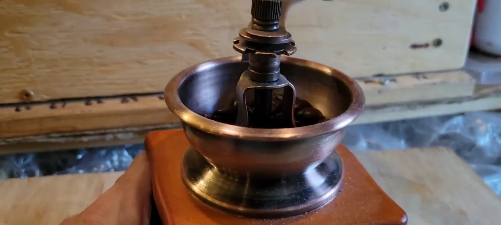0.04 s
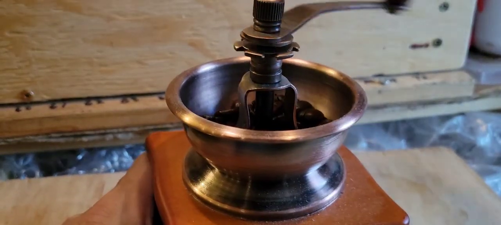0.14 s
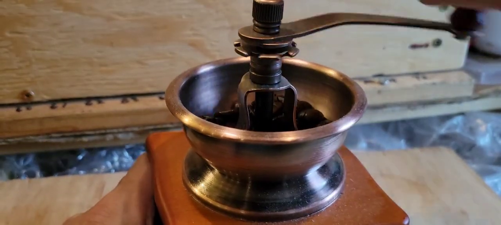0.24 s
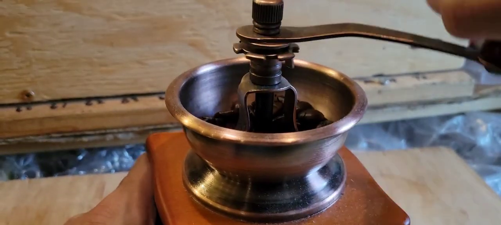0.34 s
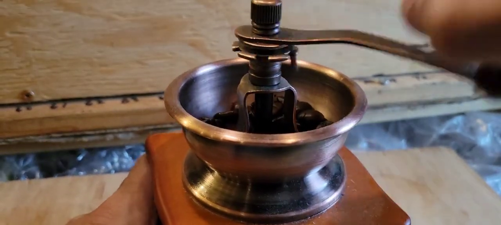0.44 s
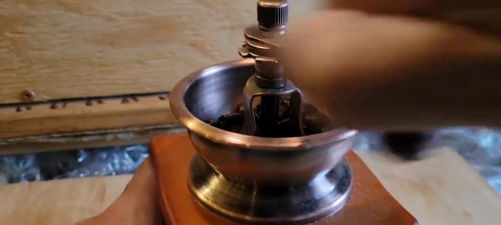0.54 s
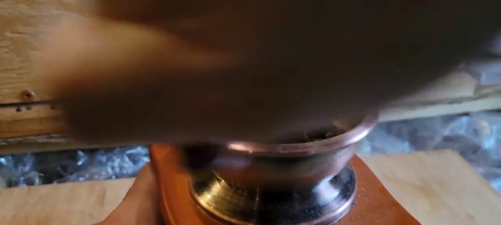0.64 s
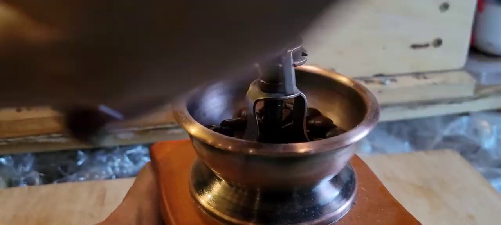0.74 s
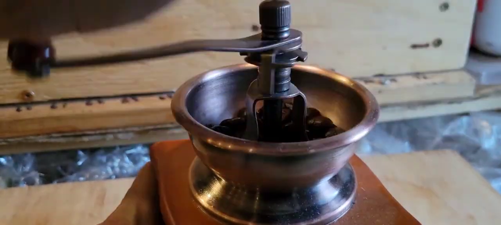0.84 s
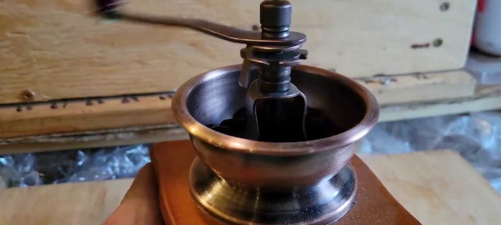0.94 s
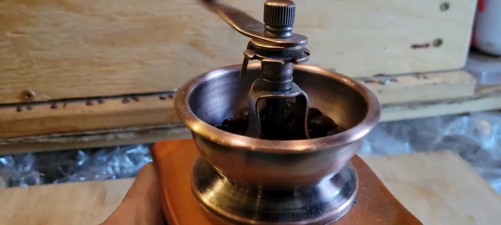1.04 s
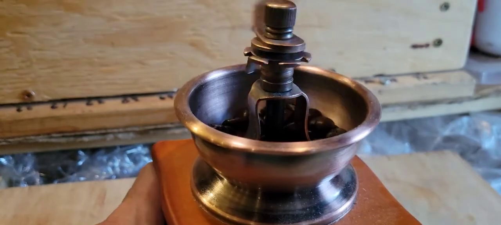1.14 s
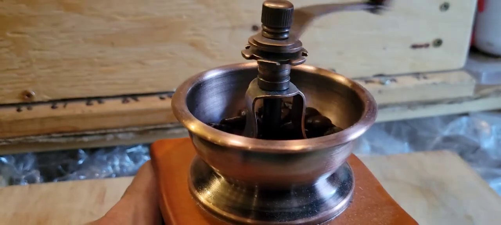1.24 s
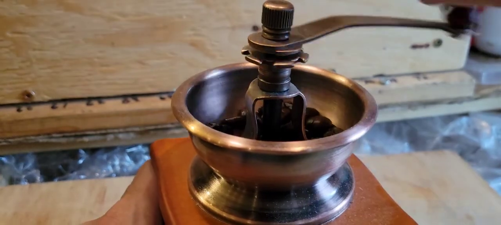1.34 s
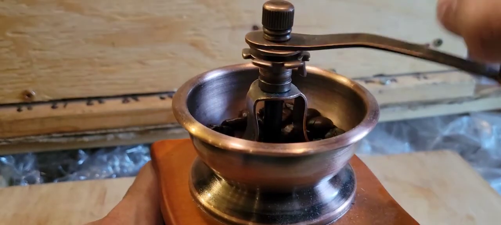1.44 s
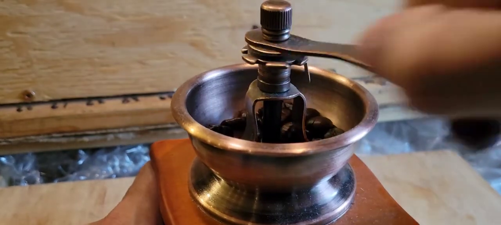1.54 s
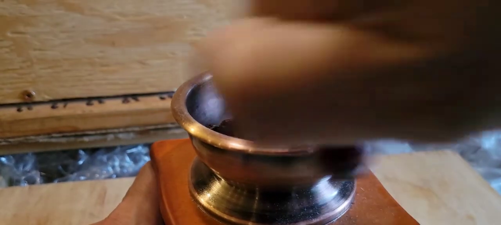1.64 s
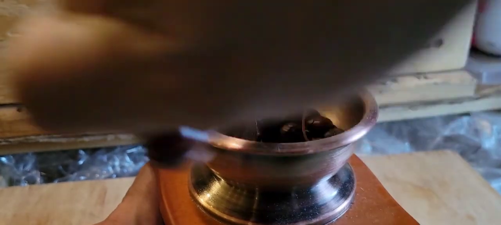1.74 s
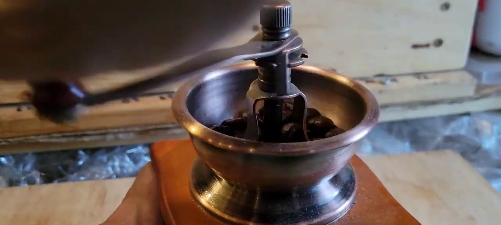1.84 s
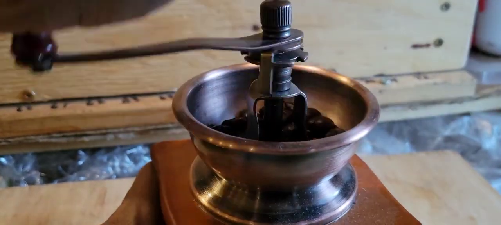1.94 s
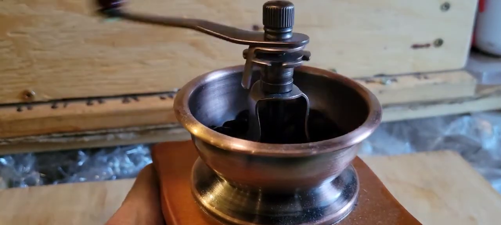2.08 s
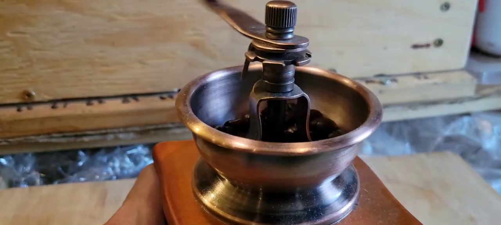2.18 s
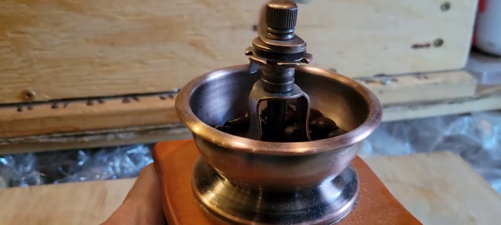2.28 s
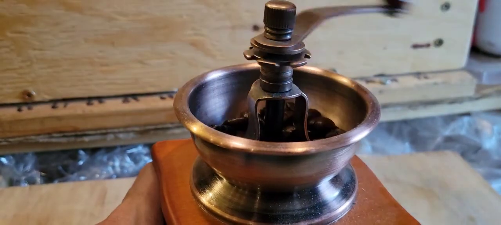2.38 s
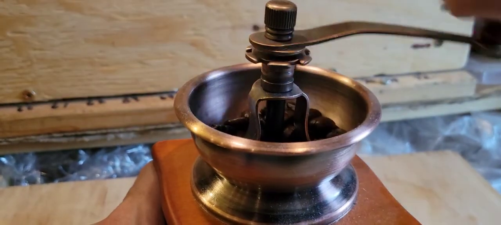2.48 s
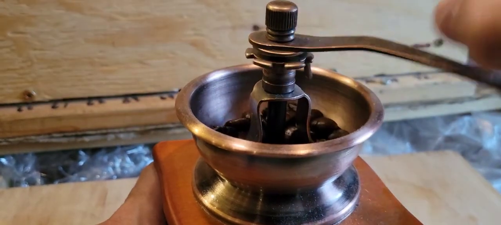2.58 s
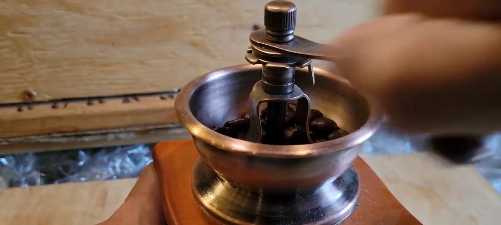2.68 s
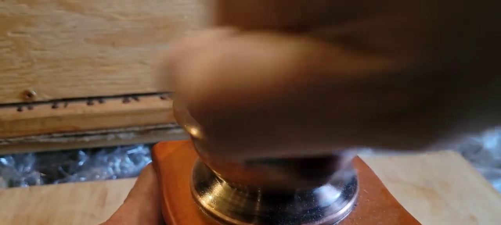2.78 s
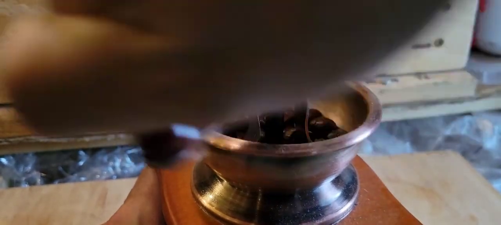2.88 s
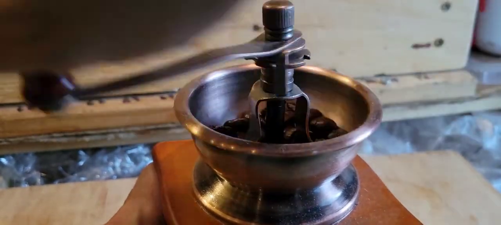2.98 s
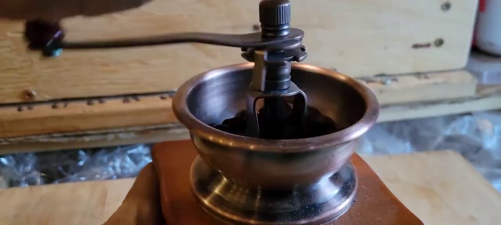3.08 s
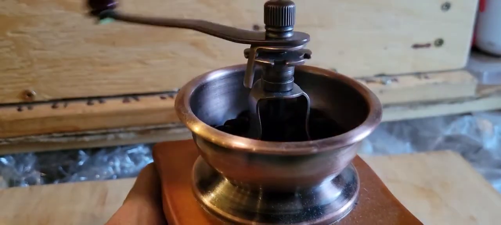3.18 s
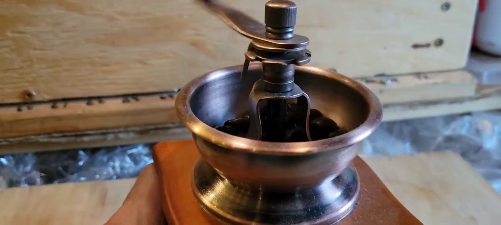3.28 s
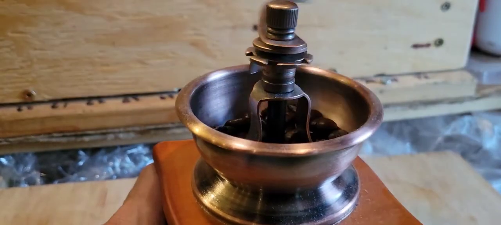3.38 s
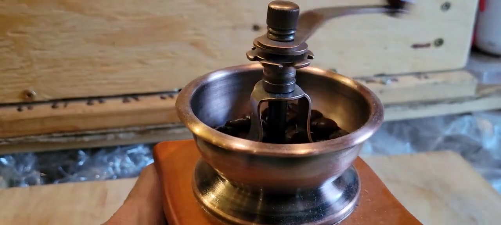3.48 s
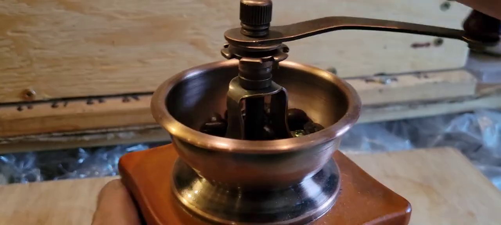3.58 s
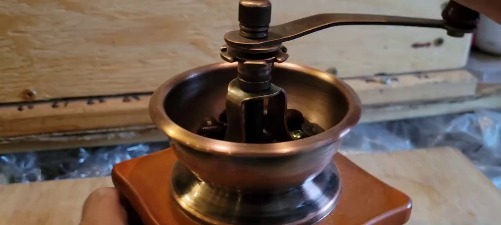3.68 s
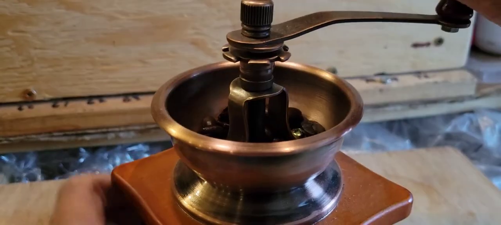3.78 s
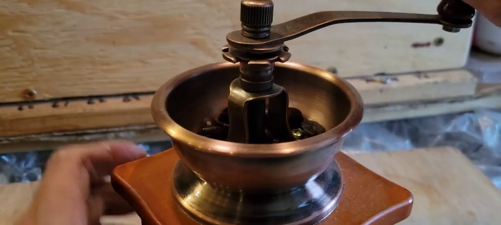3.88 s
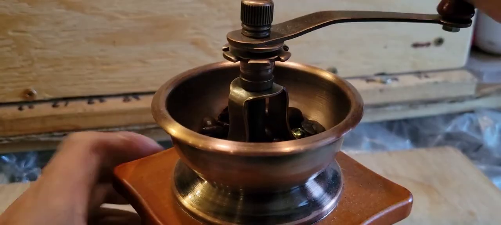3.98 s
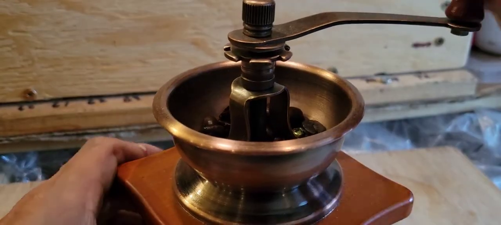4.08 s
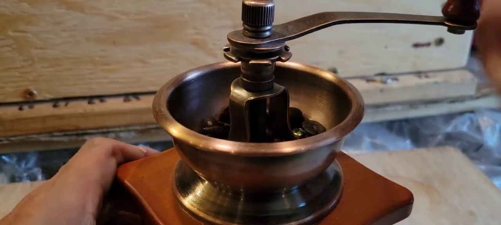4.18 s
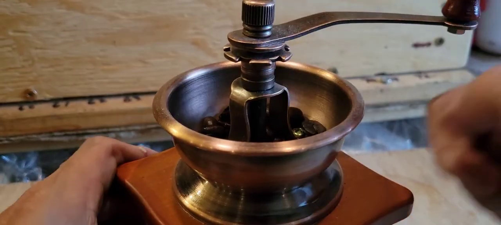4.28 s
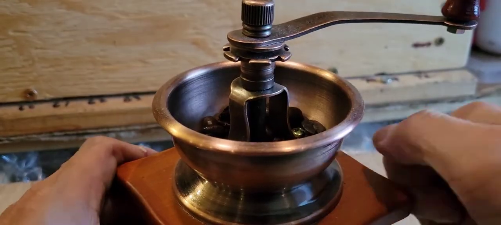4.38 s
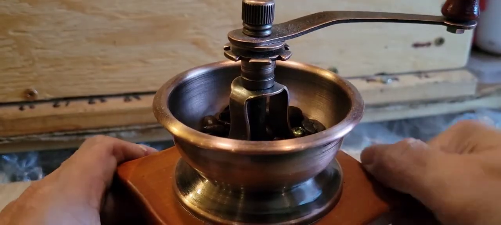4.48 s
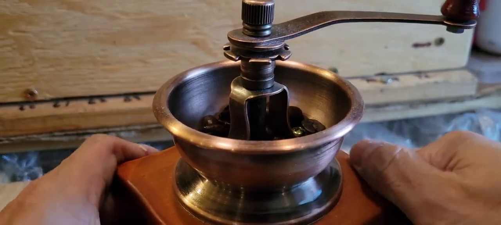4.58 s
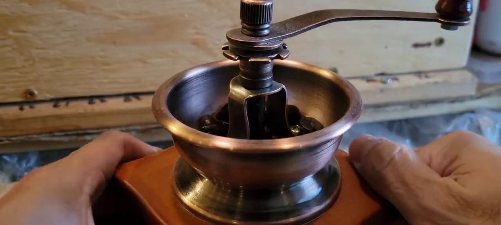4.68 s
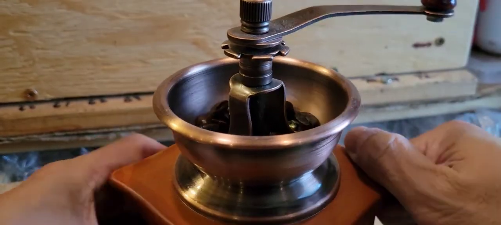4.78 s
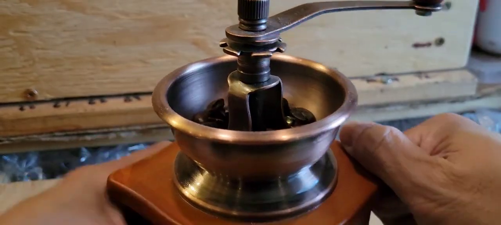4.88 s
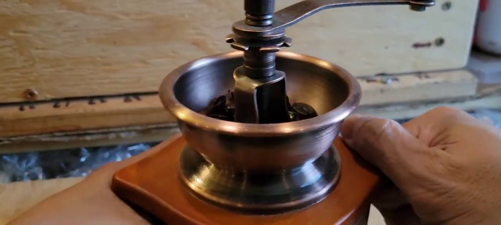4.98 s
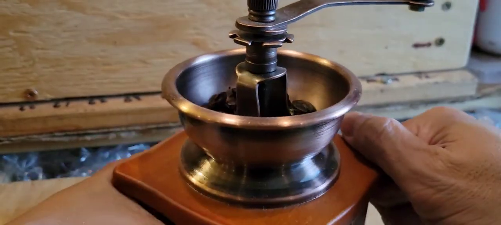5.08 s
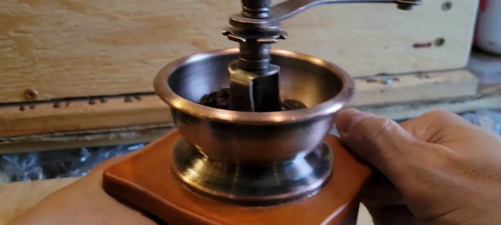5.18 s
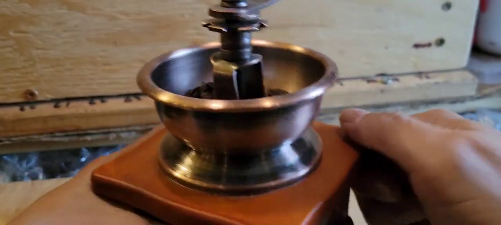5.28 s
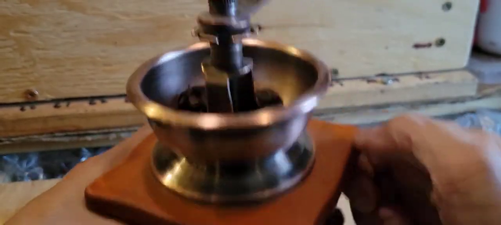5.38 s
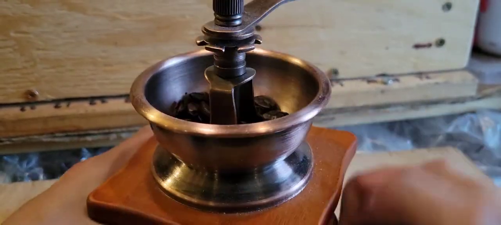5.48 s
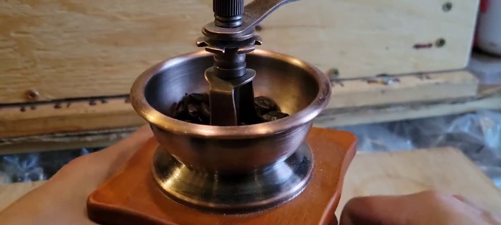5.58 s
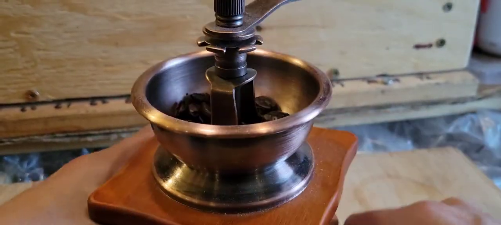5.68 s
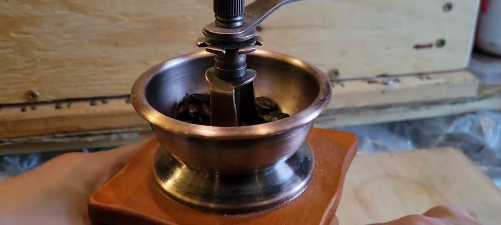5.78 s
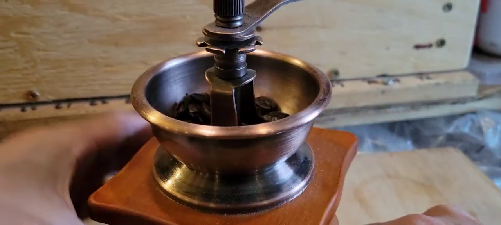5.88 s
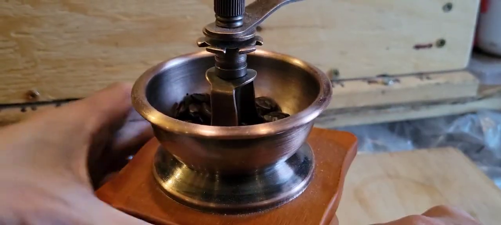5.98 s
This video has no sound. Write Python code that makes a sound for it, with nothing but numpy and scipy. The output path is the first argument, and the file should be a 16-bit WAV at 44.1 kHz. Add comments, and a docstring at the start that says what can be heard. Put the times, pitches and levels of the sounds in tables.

```python
"""A hand-cranked coffee mill with a wooden box and a metal bowl crunches beans, close by, inside a small van.
From the start a low rumble and a wavering hum lie underneath; the rumble is louder while the crank turns.
Random fractures snap in the burr, knock in the box walls, thud in the drawer cavity and ring the bowl.
At 3.65 s the crank stops; hands then slide over the box with filtered noise. Damped swings and noise bursts
make the box bump on the board, most strongly near 5.6 s, and its loose fittings tick."""
import sys
import numpy as np
from scipy import signal
from scipy.fft import rfft, irfft, next_fast_len
from scipy.io import wavfile
from scipy.ndimage import uniform_filter1d, map_coordinates

SR = 44100
rng = np.random.default_rng(int(sys.argv[2]) if len(sys.argv) > 2 else 0)


def file_out(sig):
    """Save sig as 16-bit WAV at sys.argv[1]."""
    # one column per channel
    cols = np.atleast_2d(sig).T
    # limit, then scale
    lim = np.clip(cols, -1, 1)
    pcm = np.round(lim * 32767).astype(np.int16)
    wavfile.write(sys.argv[1], SR, pcm)


N = 265923
TIME = np.arange(N) / SR  # time of each sample (s)
STOP_S = 3.648  # the crank halts

# "Relative level" means before the fixed gain that the function adds.
# Whole beans breaking [t/s, snap relative level/dB, wall knock relative level/dB,
# cavity thud relative level/dB, knock f/Hz]
BEAN_CRACKS = [(0.139, -38.5, -40, -47, 970), (0.1925, -28, -26, -43, 1120),
               (0.3052, -30.5, -28.5, -36.5, 1010), (0.393, -24.5, -25.5, -28.5, 870),
               (0.461, -41, -24.5, -45.5, 1180), (0.5532, -27.5, -30, -35.5, 1180),
               (0.6598, -27, -45, -35.5, 1080), (0.7033, -29, -28.5, -54.5, 1190),
               (0.8643, -31, -21, -40, 1200), (0.9341, -27, -26.5, -33.5, 1180),
               (0.9457, -24.5, -23, -45, 1170), (0.9548, -24.5, -33.5, -30, 1120),
               (1.056, -32, -23, -26, 1060), (1.118, -25, -30, -36, 1010), (1.1824, -27.5, -29, -34, 1150),
               (1.2601, -25.5, -24.5, -30.5, 1050), (1.291, -28, -23, -35, 1070),
               (1.3237, -24.5, -19.5, -37, 1310), (1.3812, -33, -25.5, -46, 1130),
               (1.4705, -26.5, -23, -25.5, 1020), (1.49, -27, -27.5, -34, 1120),
               (1.556, -26.5, -27.5, -33, 1370), (1.59, -23.5, -22.5, -32, 1260),
               (1.7079, -28, -28.5, -52, 1270), (1.7245, -23, -40.5, -46, 1150),
               (1.915, -25, -22.5, -43.5, 1230), (1.9382, -25, -24, -49, 1220),
               (2.045, -31, -24, -33, 1130), (2.0638, -21.5, -17.5, -53.5, 1154),
               (2.1006, -32, -22, -42.5, 1250), (2.3076, -29, -20.5, -22, 990),
               (2.3887, -25, -22.5, -29.5, 1270), (2.4278, -24.5, -22, -40, 970),
               (2.6519, -30, -26.5, -54, 1060), (2.725, -28.5, -25, -33, 1010),
               (3.0104, -30, -27, -62, 1254), (3.0255, -26, -25, -51, 1230), (3.226, -31, -22, -27, 1100),
               (3.266, -24.5, -39.5, -35, 970), (3.34, -25.5, -34.5, -43, 1250),
               (3.3728, -26.5, -25.5, -41.5, 1570), (3.422, -20.5, -18, -41, 1460),
               (3.5598, -24.5, -21.5, -36.5, 1220), (3.5663, -30, -20.5, -34, 1160),
               (3.6029, -22, -18.5, -27, 970)]
# How hard the burr bites, as beans wedge and give way [t/s, level/dB]
BURR_LOAD = [(0.08, -71), (0.13, -48), (0.23, -38), (0.42, -28.5), (0.55, -32), (0.64, -36.5),
             (0.72, -29.5), (0.79, -31.5), (1.07, -27), (1.16, -27), (1.23, -32.5), (1.32, -28.5),
             (1.88, -31), (2.2, -29), (2.28, -26.5), (2.45, -27.5), (3.06, -32.5), (3.26, -28),
             (3.62, -29.5)]
# A wedged bean drags along the burr and makes it rasp [start t/s, length/s, level/dB]
BEAN_SCRAPES = [(0.694, 0.046, -28.5), (1.08, 0.13, -29.5), (1.918, 0.061, -30.5), (2.896, 0.014, -29.5)]
# The box bumping on the board [t/s, thump relative level/dB, clack relative level/dB, thump f/Hz]
BOX_BUMPS = [(3.672, -52, -42.5, 340), (3.891, -52, -42, 333), (3.904, -49, -42, 300),
             (4.877, -41, -41, 260), (5.17, -30.5, -61, 276), (5.218, -35, -33.5, 314),
             (5.6239, -28.5, -18.5, 299), (5.6267, -20.5, -23, 230), (5.6399, -21.5, -39, 247),
             (5.645, -20, -28, 241), (5.671, -39.5, -38, 402), (5.692, -55, -49, 304),
             (5.734, -43, -47.5, 358), (5.912, -49, -72, 295)]
# Sharp ticks of the loose metal fittings [t/s, click relative level/dB, ring relative level/dB, ring f/Hz]
FITTING_TICKS = [(3.886, -63, -44, 4430), (4.603, -36, -47, 8940), (5.211, -32, -49, 6930),
                 (5.733, -63, -44.5, 3120)]
# Hands sliding on the box [start t/s, length/s, hiss level/dB, murmur of the box level/dB]
HAND_STROKES = [(3.66, 0.27, -61, -57), (4.004, 0.061, -67.5, -67.5), (4.559, 0.081, -56.5, -78.5),
                (4.864, 0.13, -63, -64.5), (4.953, 0.15, -57, -73), (5.142, 0.068, -53, -57),
                (5.318, 0.17, -66, -69.5), (5.54, 0.12, -59, -73.5), (5.903, 0.1, -57, -73)]
# Tone colour of the burr [f/Hz, relative level/dB]
BURR_COLOUR = [(900, -38), (1600, -13), (2280, -14.5), (2780, 1.5), (3050, -2.5), (4150, -3), (4700, -10.5),
               (5490, -3.5), (6550, -8.5), (6950, -5.5), (7500, -13), (9000, -17), (10250, -11),
               (11200, -15.5), (13400, -11), (15500, -18)]
# Tone colour of the box walls [f/Hz, relative level/dB]
WALL_COLOUR = [(300, -35), (520, -33.5), (640, -12.5), (780, -3.5), (930, 2.5), (1000, -6), (1110, 4.5),
               (1380, -0.5), (1750, -13.5), (2200, -13.5), (5000, -55)]
# Tone colour of the drawer cavity [f/Hz, relative level/dB]
CAVITY_COLOUR = [(30, -26.5), (110, -23.5), (160, -16.5), (220, -10), (282, -1), (345, -3), (410, -17),
                 (520, -28), (1200, -57.5)]
# Tone colour of a bean's shell splitting [f/Hz, relative level/dB]
SHELL_COLOUR = [(500, -23), (1600, -1), (3800, -1.5), (8000, -15), (15000, -21)]
# Tone colour of the rasping burr [f/Hz, relative level/dB]
RASP_COLOUR = [(1800, -45), (2600, -5), (3000, 0), (3600, -10), (4300, -14), (7000, -29)]
# Tone colour of the box clacking on the board [f/Hz, relative level/dB]
BOARD_COLOUR = [(300, -6), (640, 4.5), (880, 6.5), (1300, -.5), (1750, -7), (2080, 2.5), (2400, -8),
                (3600, -19), (9000, -41)]
# Tone colour of skin on varnish [f/Hz, relative level/dB]
SKIN_COLOUR = [(900, -37), (2750, -7.5), (3350, 2), (3900, -4), (4900, -4), (7000, -9.5), (9500, -12.5),
               (15000, -25)]
# Tone colour of the box murmuring under the hands [f/Hz, relative level/dB]
MURMUR_COLOUR = [(100, -28), (290, 2.5), (480, -13.5), (740, -3.5), (1400, -14), (2100, -12), (4000, -28)]
# Ringing of the metal bowl [f/Hz, relative level/dB, time to fall 60 dB/s]
BOWL_MODES = [(1981, 5.5, .13), (4984, 7.5, .24), (6955, 1.5, .11), (11703, -10, .1)]
# Tone colour of the low rumble [f/Hz, relative level/dB]
RUMBLE_COLOUR = [(32, -15.5), (44, 0.5), (78, 1), (135, -26.5), (290, -19), (480, -38.5), (2000, -40),
                 (15000, -56.5)]
# Wavering hum [mean f/Hz, relative level/dB]
HUM_TONES = [(70.0, -60)]
# How the van's echo dies away [f/Hz, time to fall 60 dB/s]
VAN_DECAY = [(200, 0.18), (1500, 0.062), (10000, 0.043)]

# burr, walls and cavity at the usual load, relative to that load (dB)
SNAP_DB, KNOCK_DB, THUD_DB = -0.5, 1, -6.5
USUAL_LOAD_DB, THUD_GROWTH = -28.5, 1.5  # load (dB); cavity gain per dB of load (dB)
# quick rise of the grinding into each split, the split itself, grinding of the pieces after: time constants (s)
RISE_S, SPLIT_S, DEBRIS_S = .001, .0018, .03
# splinters on the steel teeth: usual pitch (Hz), scatter of log pitch, time to fall 60 dB (s)
CHIP_HZ, CHIP_SPREAD, CHIP_T60 = 3350, .24, .018
CHIPS_DB, TAPS_DB = -5, -4  # small pieces in the burr and on the walls, relative to the crunch there (dB)
HOUSING_DB, HOUSING_T60 = -9, .013  # steel housing: level relative to the direct snap (dB), t60 (s)
SCRAPE_FADE_S = 0.0059
# clack and loose drawer's rattle: time constants (s), rattle relative to clack (dB)
CLACK_S, RATTLE_S, RATTLE_DB = .0026, .011, -11
CONTACT_HZ = 16000  # treble cut-off of a contact whose table level is 0 dB
STROKE_ATTACK_S, STROKE_RELEASE_S = 0.012, 0.026
GRIP_DB = -76.5  # skin creeping on the varnish between strokes
TOP_HZ = 15200  # upper band limit


def grinding():
    """Crumbs and whole beans break in the burr; each fracture shakes every part with its own strength."""
    load_db = np.interp(TIME, *np.transpose(BURR_LOAD))
    cavity_load_db = USUAL_LOAD_DB + THUD_GROWTH * (load_db - USUAL_LOAD_DB)
    force = crumbs(rate=800, spread_db=3.8, clump_db=1.3, dust=.65)
    push = force ** 0.71  # the heavy box evens out the small fractures

    snap = np.hypot(amp(load_db + SNAP_DB), amp(-12) * debris(1)) * burr_crunch(force)
    knock = np.hypot(amp(load_db + KNOCK_DB), amp(-15) * debris(2)) * wall_rattle(push)
    cavity = unit(shaken(push * amp(2.7 * wobble(29.84)), CAVITY_COLOUR))
    thud = np.hypot(amp(cavity_load_db + THUD_DB), amp(-9) * debris(3)) * cavity
    add_cracks(snap, knock, thud)
    snap = snap + scrapes(force)

    bowl_drive = unit(np.abs(snap) ** .7 * noise())
    ring = amp(-81.5) * bowl(bowl_drive)
    snap = housing(stereo(snap, side_db=-6, lead_ms=0.07, pan_db=-1))
    knock = stereo(knock, side_db=-11, lead_ms=0.18, pan_db=1.7)
    thud = stereo(thud, side_db=-21.5, lead_ms=0.097, pan_db=-2.0)
    turning = np.clip((STOP_S - TIME) / 0.00233, 0, 1)  # fades to silence just before the stop
    return van(snap + knock + thud + ring) * turning


def burr_crunch(force):
    """Small fractures excite the burr while loose pieces ping on its teeth."""
    crunch = unit(recoloured(shaken(force, BURR_COLOUR), depth_db=1.8, size=10))
    chips = amp(CHIPS_DB) * pings(300, CHIP_HZ, CHIP_T60, spread=.16, wander=.13)
    return unit(crunch + chips)


def wall_rattle(push):
    """Fractures shake the wooden walls while small pieces tap them."""
    rattle = unit(recoloured(shaken(push, WALL_COLOUR), depth_db=2.5, size=4))
    taps = amp(TAPS_DB) * pings(190, 1130, .014, spread=.13, wander=.1)
    return unit(rattle + through(taps, [(450, -28.5), (800, 0.5)]))


def add_cracks(snap, knock, thud):
    """Each whole bean splits sharply, swings the walls and then the air in the cavity."""
    for s, snap_db, knock_db, thud_db, hz in BEAN_CRACKS:
        swing = pulse(hz, t60=.011, attack=.0004)
        add(snap, s, amp(snap_db + 22) * burst(SHELL_COLOUR, life=SPLIT_S))  # the bean splits
        add(snap, s, amp(snap_db + 23.5) * burst(BURR_COLOUR, life=0.0034))  # crumbles
        add(snap, s, amp(snap_db + 18.0) * chip())  # and flings a splinter
        add(knock[:1], s, amp(knock_db + 25.5) * swing)
        add(knock[1:], s, amp(knock_db + 27.0) * burst(WALL_COLOUR, life=0.0015)[:1])
        add(thud[:1], s + 0.0014, amp(thud_db + 28.5) * pulse(289.3, t60=0.038, attack=0.0028))


def debris(column):
    """Envelope of extra grinding round each broken bean, following one level column of its crack."""
    energy = sum((amp(row[column]) * swell(row[0], 0, RISE_S, DEBRIS_S)) ** 2 for row in BEAN_CRACKS)
    return np.sqrt(energy)


def scrapes(force):
    """The burr's resonance swells while a bean drags along it."""
    drag = sum(amp(db) * swell(s, length, SCRAPE_FADE_S, SCRAPE_FADE_S) for s, length, db in BEAN_SCRAPES)
    return drag * unit(shaken(force, RASP_COLOUR))


def crumbs(rate, spread_db, clump_db, dust):
    """Strength of countless small fractures or slips: random sizes, in clumps, over fine scraping."""
    sizes = amp(spread_db * np.minimum(rng.standard_normal(N), 2))
    grains = unit((rng.random(N) < rate / SR) * sizes)
    return np.hypot(grains, dust) * amp(clump_db * np.clip(wobble(130), -2, 2))


def pings(rate, hz, t60, spread, wander, count=640):
    """Countless small impacts, each ringing at its own pitch; the favoured pitch wanders in time."""
    start = rng.integers(N, size=int(rate * N / SR))
    pitch, size, common, unrelated = rng.standard_normal((4, len(start), 1))
    t = np.arange(count) / SR
    own_hz = hz * np.exp(spread * pitch + wander * wobble(14)[start, None])
    rings = amp(3 * np.minimum(size, 2) - 60 * t / t60) * np.sin(2 * np.pi * own_hz * t)
    where = (start[:, None] + np.arange(count)).ravel()
    rows = []
    for share in (common, unrelated):  # each ping has its own share in each row
        weights = (np.tanh(share) * rings).ravel()
        rows.append(np.bincount(where, weights, N)[:N])
    return unit(np.array(rows))


def chip(count=3):
    """A splinter rings the steel teeth at a few pitches of its own: two rows, each of energy 1."""
    pitches = CHIP_HZ * np.exp(CHIP_SPREAD * rng.standard_normal(count))
    return energy_one(ringing([(hz, 0, CHIP_T60) for hz in pitches]))


def housing(x, count=1024):
    """The steel housing swells and rings briefly; dense modes are modelled by a different noise tail per side."""
    t = np.arange(count) / SR
    modes = rng.standard_normal((2, count)) * t ** 2 * amp(-60 * t / HOUSING_T60)
    ring = signal.fftconvolve(x, energy_one(modes), axes=1)[:, :N]
    return (x + amp(HOUSING_DB) * ring) / np.hypot(1, amp(HOUSING_DB))


def bowl(drive):
    """The metal bowl rings on, as a sum of decaying modes, after whatever drives it."""
    return signal.fftconvolve(drive, ringing(BOWL_MODES), axes=1)[:, :N]


def bumps():
    """The box drops on an edge with a hollow thump, a clack and a short rattle; loose fittings tick brightly."""
    wood, ticks = np.zeros((2, 2, N))
    for s, thump_db, clack_db, hz in BOX_BUMPS:
        clack = burst(BOARD_COLOUR, life=CLACK_S)
        clack = clack + amp(RATTLE_DB) * burst(BOARD_COLOUR, life=RATTLE_S)
        softness = signal.butter(2, CONTACT_HZ * np.sqrt(amp(clack_db)), fs=SR)  # gentle contacts are duller
        add(wood[:1], s, amp(thump_db + 26.0) * pulse(hz, t60=0.043, attack=0.0022))
        add(wood, s, amp(clack_db + 21.5) * signal.lfilter(*softness, clack))
    tick_colour = [(300, -4), (3000, 2), (6800, 8), (9000, -2), (15000, 3)]  # f/Hz, relative level/dB
    for s, click_db, ring_db, hz in FITTING_TICKS:
        add(ticks[:1], s, amp(ring_db + 21) * pulse(hz, t60=.03, attack=.0004))
        add(ticks, s, amp(click_db + 23.0) * burst(tick_colour, life=0.0022))
    ticks = ticks + amp(-66) * bowl(ticks + 2 * wood)
    wood = stereo(wood, side_db=-10, lead_ms=.1, pan_db=-1.2)
    return wood + stereo(ticks, side_db=0, lead_ms=.05, pan_db=-.3)


def hands():
    """Skin sticks and scrapes on the varnish in shifting colours, and the box murmurs with it."""
    levels = amp(GRIP_DB)
    for s, length, hiss_db, murmur_db in HAND_STROKES:
        stroke = swell(s, length, STROKE_ATTACK_S, STROKE_RELEASE_S)
        levels = levels + amp([[hiss_db], [murmur_db]]) * stroke
    hiss, murmur = levels
    slips = crumbs(rate=600, spread_db=3.5, clump_db=1.5, dust=.9)

    def rub(colour):
        """Noise shaped by the slips and heard through a body."""
        return unit(through(recoloured(slips * noise(), depth_db=4.5, size=14), colour))

    sound = hiss * stereo(rub(SKIN_COLOUR), side_db=-1.5, lead_ms=0.05, pan_db=0.2)
    sound += murmur * stereo(rub(MURMUR_COLOUR), side_db=-0.5, lead_ms=0.073, pan_db=0.5)
    # the last slides hiss more brightly
    sound += hiss * np.interp(TIME, [5, 6], [0, .8]) * rub([(5000, -26.0), (13500, -4.5)])
    return sound * (TIME > STOP_S)


def van(x):
    """The close plywood walls answer briefly, weakly in the bass; the answer is redrawn every 0.2 s."""
    late, size = np.zeros((2, N)), SR // 5
    for start in range(0, N, size):
        echo = signal.fftconvolve(x[:, start:start + size], tail(VAN_DECAY), axes=1)
        add(late, start / SR + .0025, echo)
    return x + amp(-10.5) * through(late, [(300, -9.5), (1000, 2.5)])


def tail(decay, count=11025):
    """Two unrelated noise tails of energy 1; each frequency dies at its own speed."""
    hz, t, z = signal.stft(rng.standard_normal((2, count)), SR, nperseg=256)
    fading = z * amp(-60 * t / along(decay, hz)[:, None])
    return energy_one(signal.istft(fading, SR, nperseg=256)[1])


def background():
    """A low noise rumble with a wavering hum; the cranking arm shakes the board and makes the rumble louder."""
    cranking = np.interp(TIME, [.1, .4, STOP_S, STOP_S + 0.1], [0, 1, 1, 0])
    rumble = amp(-55.5 + 7.2 * cranking) * unit(through(noise(), RUMBLE_COLOUR))
    for hz, db in HUM_TONES:
        level = amp(db + 0.5 + 2.4 * wobble(5.5))
        rumble[0] += level * np.sin(2 * np.pi * hz * TIME + wobble(7.9))
    return stereo(rumble, side_db=-13.0, lead_ms=0.17, pan_db=-1.3)


def amp(db):
    """Turn decibels into a plain factor."""
    return 10 ** (np.asarray(db) / 20)


def unit(x):
    """Scale to an average power of 1."""
    return x / np.sqrt(np.mean(x ** 2) + 1e-20)


def energy_one(x):
    """Scale each row to a total energy of 1."""
    return x / np.linalg.norm(x, axis=1, keepdims=True)


def noise():
    """Two unrelated rows of white noise."""
    return rng.standard_normal((2, N))


def along(points, hz):
    """Read (f/Hz, value) points on a log frequency axis."""
    f, v = np.transpose(points)
    return np.interp(np.log(hz + 1), np.log(f + 1), v)


def wobble(rate):
    """A smooth random curve, rate knots a second."""
    return map_coordinates(rng.standard_normal(int(N * rate / SR) + 4), [TIME * rate])


def swell(s, length, attack, release):
    """An envelope that rises towards time s, holds for length and dies away (all in s)."""
    t = TIME - s
    return np.exp(np.minimum(t, 0) / attack - np.maximum(t - length, 0) / release)


def filtered(x, response):
    """Multiply the spectrum of x by a response that depends on frequency."""
    m = next_fast_len(N + SR // 2)
    return irfft(rfft(x, m) * response(np.fft.rfftfreq(m, 1 / SR)), m)[..., :N]


def through(x, colour, size=4096):
    """Send rows of x through a body with this colour that responds only after it is struck."""
    cepstrum = irfft(np.log(amp(along(colour, np.fft.rfftfreq(size, 1 / SR)))))
    cepstrum[1:size // 2] *= 2  # folding the cepstrum gives a minimum-phase response
    cepstrum[size // 2 + 1:] = 0
    response = irfft(np.exp(rfft(cepstrum)))
    return signal.fftconvolve(x, response[None], axes=1)[:, :x.shape[1]]


def shaken(drive, colour):
    """A body shaken by noise whose strength follows the drive."""
    return through(drive * noise(), colour)


def recoloured(x, depth_db, size):
    """The colour shifts from moment to moment; random gains are smoothed over size frames of about 3 ms."""
    z = signal.stft(x, nperseg=256)[2]
    field = uniform_filter1d(rng.standard_normal(z.shape[1:]), 5, 0)
    field = uniform_filter1d(field, size, 1)
    return signal.istft(z * amp(depth_db * unit(field)), nperseg=256)[1][:, :N]


def burst(colour, life, size=3000):
    """A brief run of tiny fractures or contacts, as fading noise through a body: two rows, each of energy 1."""
    fading = rng.standard_normal((2, size)) * np.exp(-np.arange(size) / SR / life)
    return energy_one(through(fading, colour))


def pulse(hz, t60, attack, count=5000):
    """One damped ringing tone of a panel, cavity or fitting, energy 1."""
    t = np.arange(count) / SR
    swing = np.sin(2 * np.pi * hz * t) * amp(-60 * t / t60) * (1 - np.exp(-t / attack))
    return energy_one(swing[None])


def ringing(modes, count=14700):
    """Two rows of decaying modes, struck at random phases."""
    t = np.arange(count) / SR
    ring = 0
    for hz, db, t60 in modes:
        ring = ring + amp(db - 60 * t / t60) * np.sin(2 * np.pi * (hz * t + rng.random((2, 1))))
    return ring * (1 - np.exp(-t / .0005))


def add(track, s, sound):
    """Mix a sound into the track at time s."""
    part = track[:, round(s * SR):][:, :sound.shape[1]]
    part += sound[:, :part.shape[1]]


def stereo(pair, side_db, lead_ms, pan_db):
    """A common and an unrelated row become left and right; left leads for positive lead_ms."""
    mid, side = pair[0], amp(side_db) * pair[1]
    both = np.array([mid + side, mid - side]) / np.hypot(1, amp(side_db))
    both = both * amp([[pan_db / 2], [-pan_db / 2]])

    def lead(hz):
        """Opposite phase shifts, held constant above a quarter cycle of lead."""
        return np.exp(np.outer([1j, -1j], np.pi * np.minimum(hz * lead_ms / 1000, 1 / 4)))

    return filtered(both, lead)


def scene():
    """Grinding, then box and hands in the same van, over the background."""
    return grinding() + van(bumps() + hands()) + background()


def record(dry):
    """Limit peaks to 0.9 and cut steeply above the band limit."""
    return filtered(np.clip(dry, -.9, .9), lambda hz: 1 / np.sqrt(1 + (hz / TOP_HZ) ** 120))


dry = scene()
out = record(dry)
file_out(out)
```